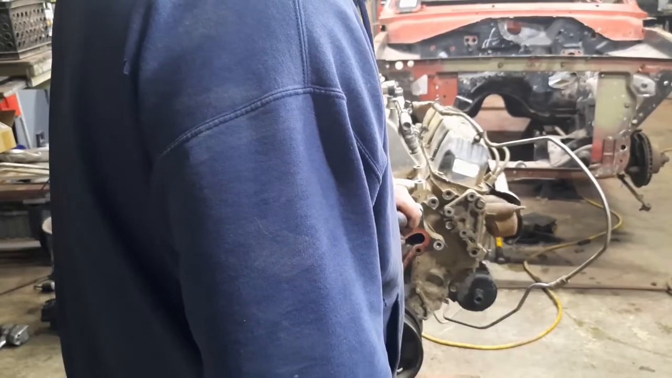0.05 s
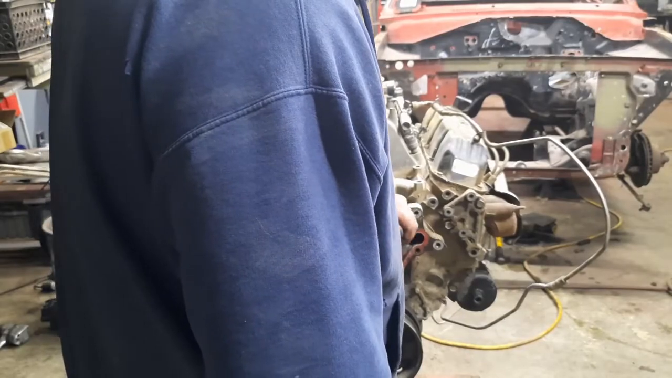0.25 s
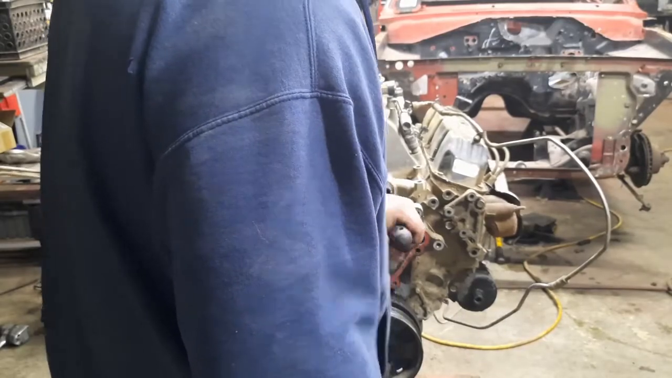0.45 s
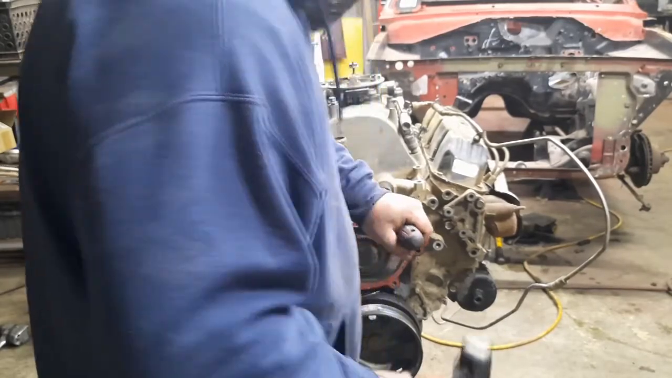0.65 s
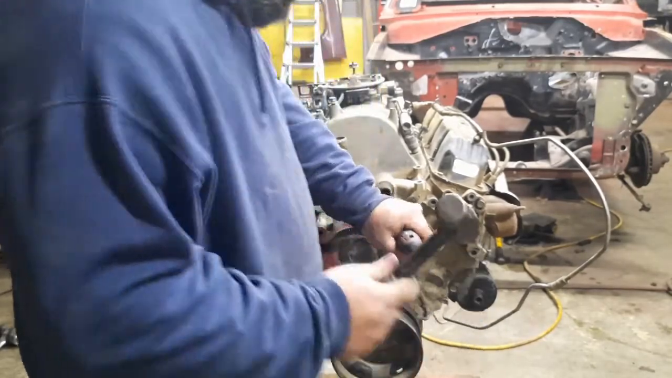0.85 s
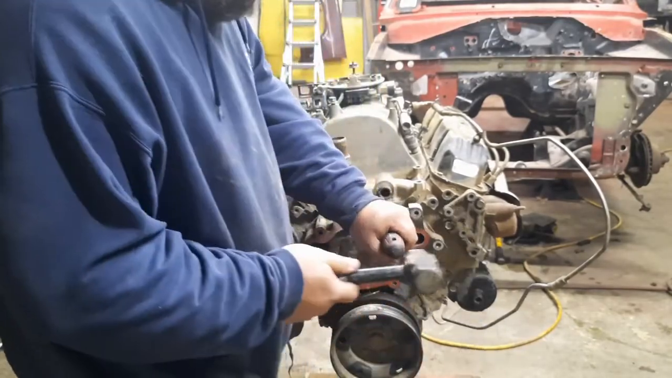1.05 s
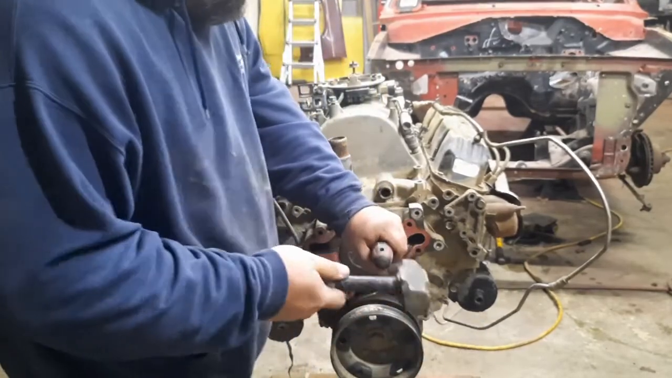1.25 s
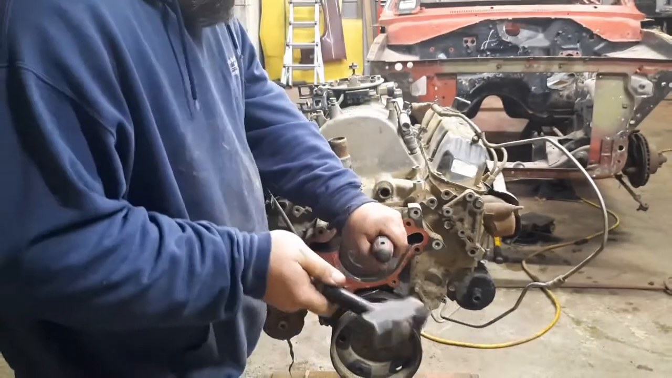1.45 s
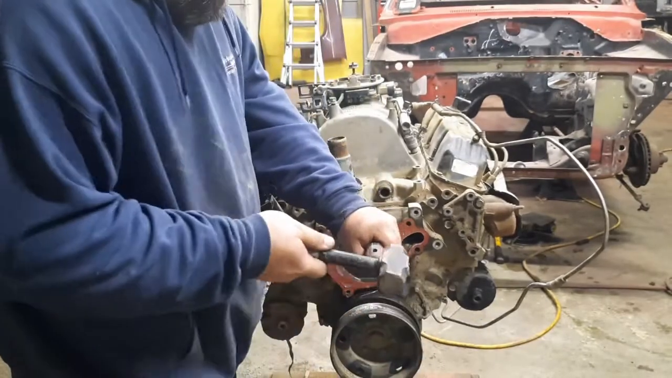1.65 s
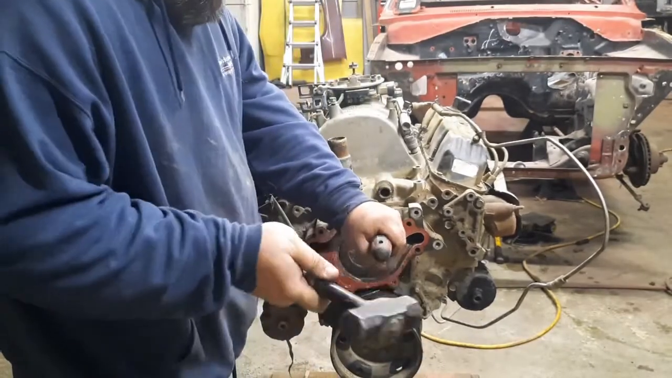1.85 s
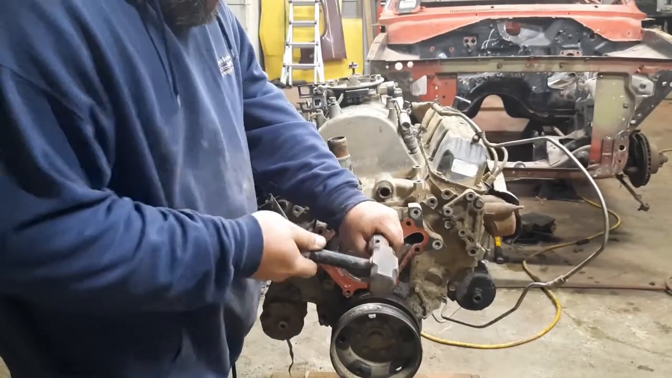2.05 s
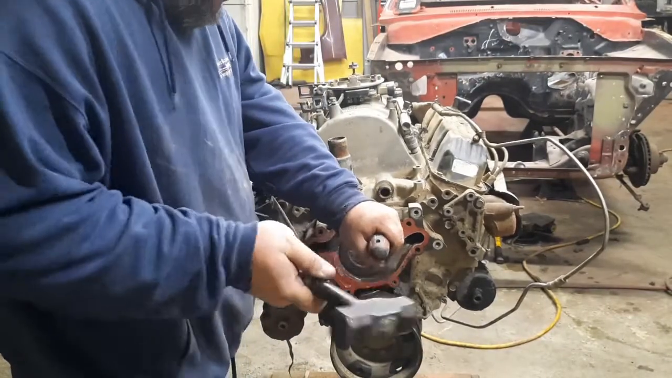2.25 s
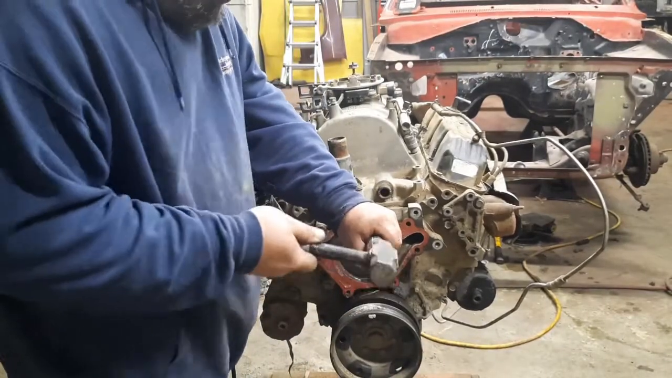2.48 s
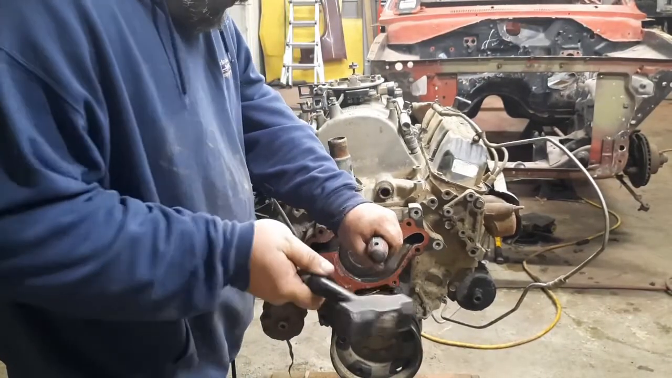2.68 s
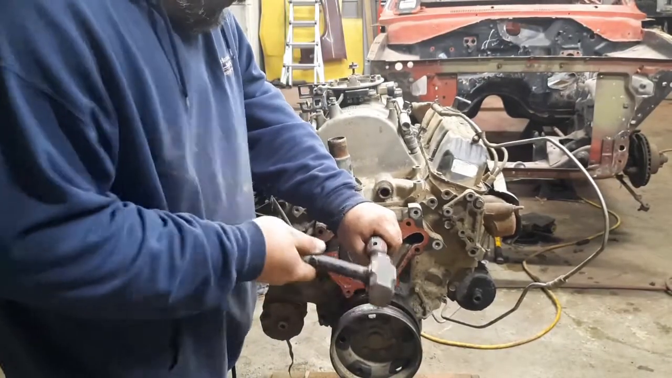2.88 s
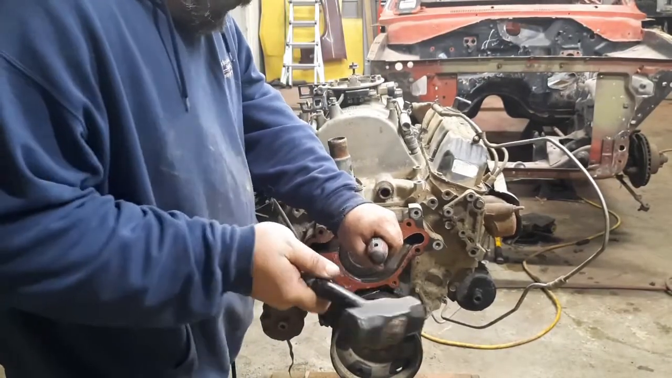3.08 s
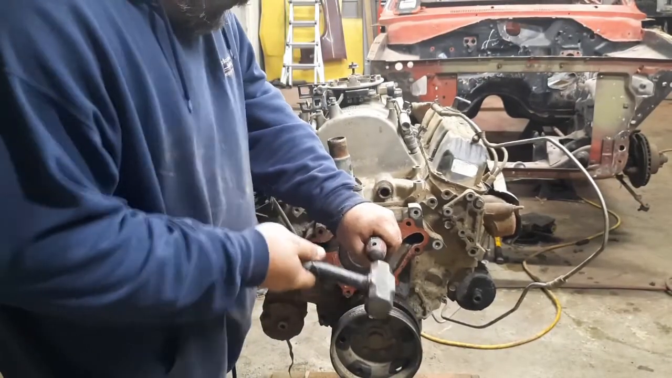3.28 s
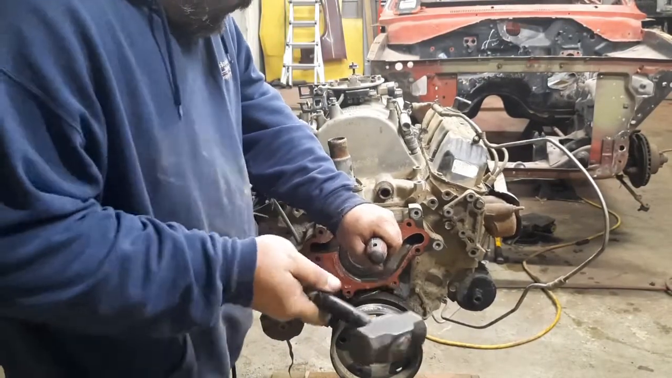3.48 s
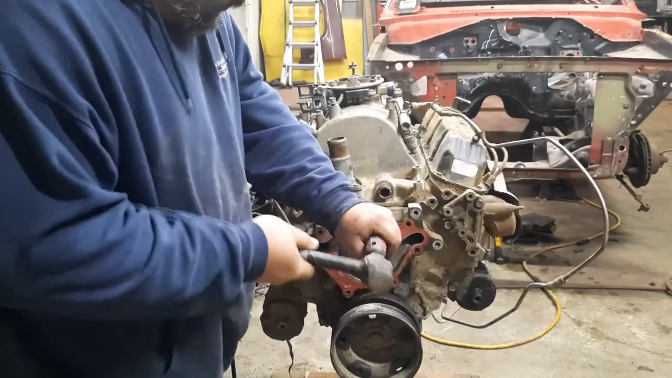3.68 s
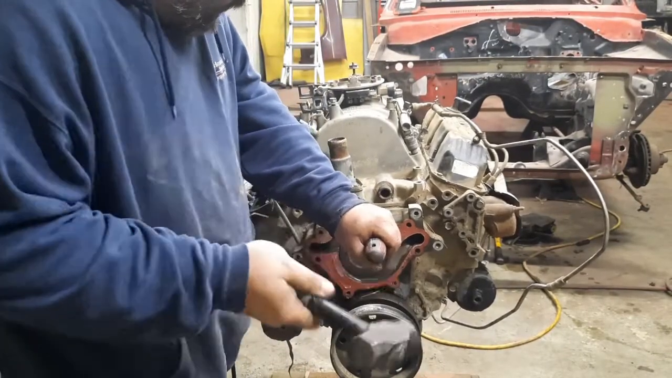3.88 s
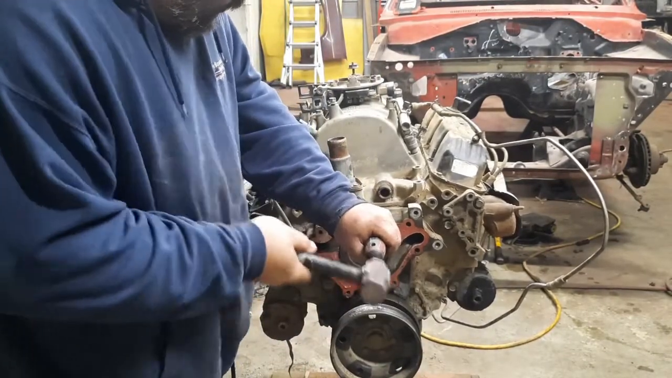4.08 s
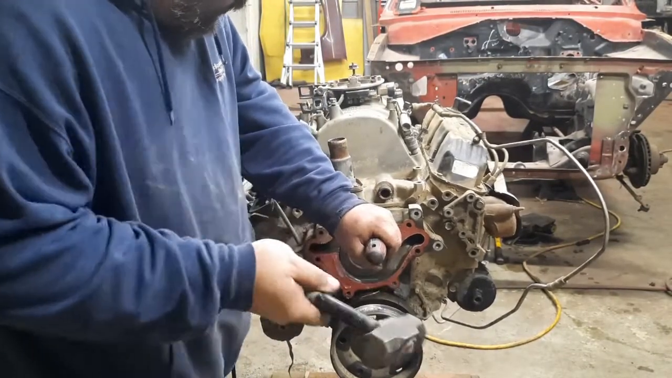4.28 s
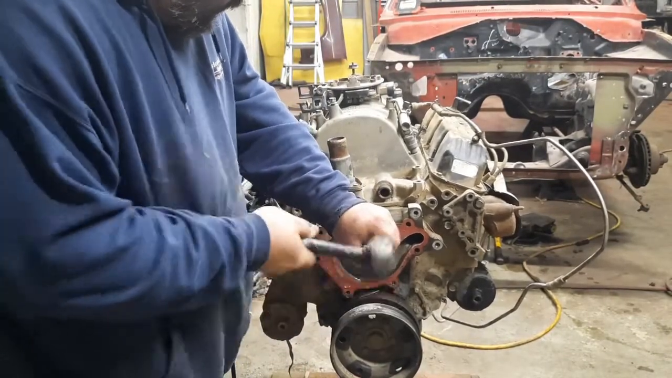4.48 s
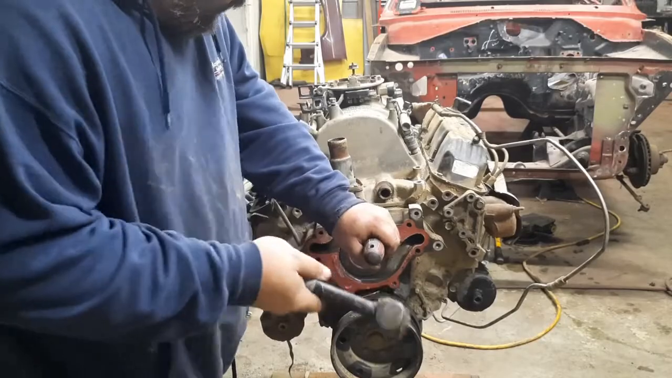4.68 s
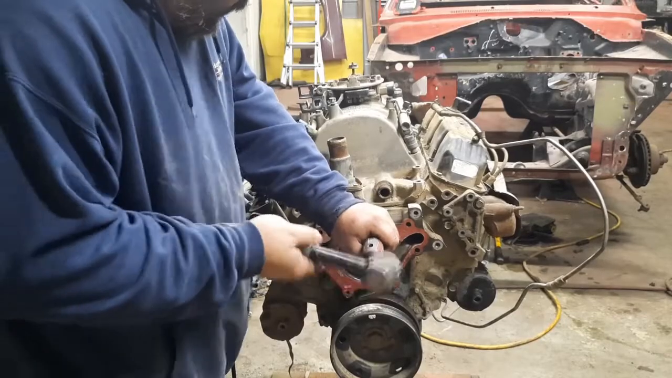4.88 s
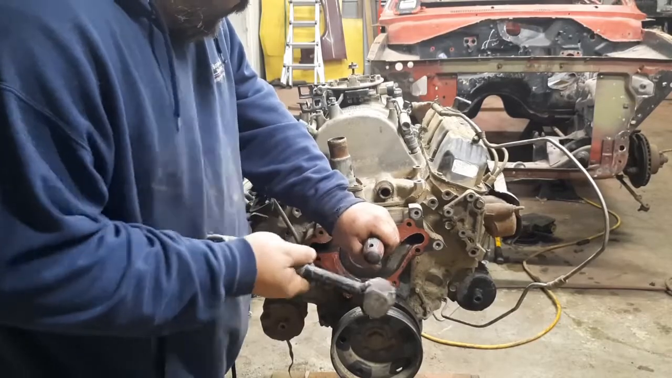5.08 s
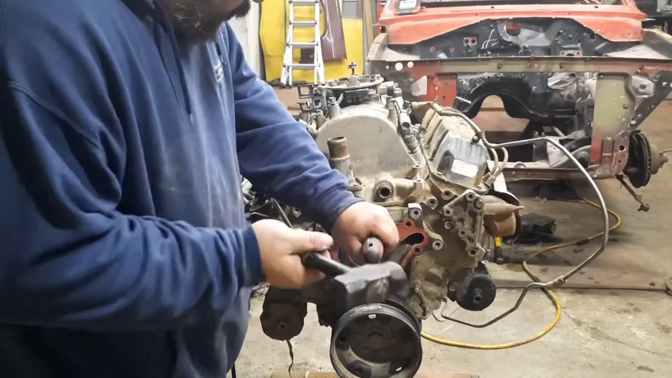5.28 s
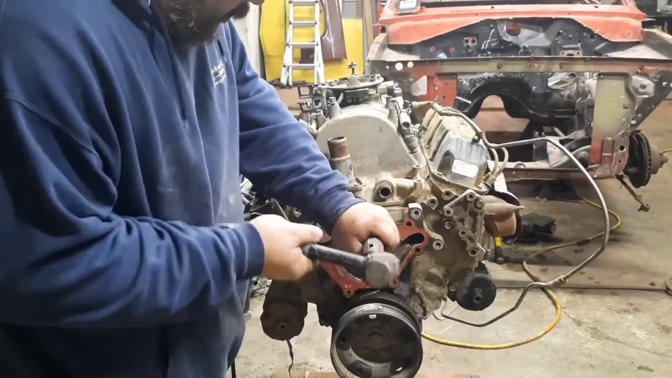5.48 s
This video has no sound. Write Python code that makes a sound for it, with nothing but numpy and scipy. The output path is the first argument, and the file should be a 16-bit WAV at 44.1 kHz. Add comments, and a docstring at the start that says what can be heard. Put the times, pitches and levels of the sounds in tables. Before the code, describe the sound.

A garage with a very faint, low, steady hum. At the start a thin, high metallic clink is dying away. Soft sleeve rustles come at about 0.5 and 0.65 seconds, then a steel tool scrapes roughly into place around 0.95-1.1 with a tiny bright tick. At 1.13 a light, dull hammer tap lands and bounces at once. Small metal touches and a cloth rub follow between 1.27 and 1.55. From 1.57 to 5.37 come ten hard blows, roughly every 0.42 seconds, loud and close. The first is a bright, loose clank with little ring; as the part seats, the strikes crack harder and the cast-iron block rings deeper and longer, fullest near 3.7. Later blows are solid and gradually more damped, with slightly more low thud. Each leaves a diffuse garage echo of under a second, overlapping the next; the last is still ringing at the end.

```python
"""A garage, humming faintly: a steel hammer drives a part into a cast-iron engine block. A clink fades, a sleeve
rustles, the tool scrapes into place, then come one light, bouncing tap and ten hard blows. Rubbing is coloured noise
under stroke envelopes; each blow is a burst of noise (crack) and two sets of damped modes, the clank of the part and
the ring of the block. As the part seats, the clank moves from its own pitch into the block, which rings deeper and
longer. The garage answers each blow with diffuse, decaying noise."""
import sys
import numpy as np
from scipy import signal
from scipy.fft import rfft, irfft, next_fast_len
from scipy.io import wavfile
from scipy.ndimage import uniform_filter1d, map_coordinates

SR = 44100
rng = np.random.default_rng(int(sys.argv[2]) if len(sys.argv) > 2 else 0)


def transcribe(signal):
    """Save signal, clipped to [-1, 1], as a 16-bit WAV file at the path in sys.argv[1]."""
    frames = np.atleast_2d(signal).T
    limited = np.clip(frames, -1, 1)
    pcm = np.round(limited * 32767).astype(np.int16)
    wavfile.write(sys.argv[1], SR, pcm)


N = 243873  # length in samples
AGE = np.arange(SR) / SR  # time since a contact, s

# Low tones in the hum. Each row: frequency in Hz, level in dB before a common lift.
DRONE_TONES = [(75.4, -71.5), (156.1, -77.5)]
DRONE_LIFT_DB = 5.5
# Rumble of the garage. Each row: frequency in Hz, relative density in dB per Hz.
HUM_SPECTRUM = [(20, -29.5), (33, -26), (48, -5), (62, -1.5), (88, 1), (115, -13), (155, -1), (200, -16.5),
                (310, -8), (420, -8.5), (620, -13.5), (950, -21), (2500, -35), (9400, -41), (16000, -43)]
# A faint, fading clink. Each row: frequency in Hz, t60 in s, level in dB.
CLINK_MODES = [(1890, 0.47, -62.5), (2720, .33, -64), (3295, 0.37, -67), (3460, 0.41, -61),
               (3540, 0.44, -61), (5216, .34, -66)]
# The sleeve rubs with each move of the arm. Each row: start in s, length in s, level in dB.
SLEEVE_STROKES = [(-.06, .06, -55), (.465, 0.028, -57), (.65, 0.095, -56), (.92, .06, -60),
                  (1.5, .04, -51.5), (1.542, 0.028, -41)]
SLEEVE_ATTACK_S, SLEEVE_T60_S = 0.023, 0.52
# Rubbing cloth. Each row: frequency in Hz, relative density in dB per Hz.
CLOTH_SPECTRUM = [(350, -30), (600, -3.5), (768, -9.5), (1240, -6), (2650, -9), (3210, -13), (6200, -14),
                  (13000, -34), (16000, -34)]
# The tool is set on, then pushed home. Each row: start in s, length in s, level in dB.
SCRAPE_STROKES = [(.935, .055, -52.5), (.991, .11, -33.5)]
SCRAPE_ATTACK_S, SCRAPE_T60_S = 0.01, 0.4
# Scraping steel. Each row: frequency in Hz, relative density in dB per Hz.
SCRAPE_SPECTRUM = [(59, -44), (100, -5.5), (210, -19), (328, 0), (373, -7.5), (547, -7), (872, -9),
                   (950, 0.5), (1200, -9.5), (2690, -12), (9410, -30.5), (11400, -34.5), (16000, -42)]
# Light touches of steel. Each row: time in s, level in dB.
TOUCHES = [(1.0152, -31.5), (1.2745, -52), (1.286, -37.5), (1.4905, -37)]
# Colour of a touch. Each row: frequency in Hz, relative density in dB per Hz.
TOUCH_SPECTRUM = [(1500, -32), (4500, -4.5), (7000, 6.5), (9500, -8), (13000, -7), (16000, -20.5)]

# Hammer blows, the first two being the tap and its bounce. Each row: time in s, force in dB.
BLOW_FORCES = [(1.1291, -8.5), (1.1372, -17.5), (1.5700, -0.5), (1.9773, 0), (2.39, 1), (2.8163, 1),
               (3.2419, 1), (3.6570, 1), (4.0762, 0.5), (4.4990, 0.5), (4.9266, 0), (5.371, 0)]
# How tightly the part sits: the first hard blow frees it, then it tightens until it is home.
# Each row: time in s, seating from 0 (loose) to 1 (tight).
SEATING_CURVE = [(1.13, 0.23), (1.57, 0), (1.95, 0.064), (4.1, 0.97), (4.9, 1), (5.37, 0.82)]
# Short resonances of the struck part. Each row: frequency in Hz, t60 in s, dB when loose, dB when seated.
CLANK_MODES = [(331.8, 0.075, -22, -16), (485.6, 0.081, -30.5, -16), (611, 0.11, -29, -22),
               (806, 0.057, -31, -29.5), (903, 0.053, -29.5, -22.5), (1116, 0.05, -22, -9),
               (1282, 0.029, -6.5, -15), (1389, 0.022, -1.5, -6.5), (1519, 0.032, -15, -11.5),
               (1686, 0.066, -30, -28), (2037, 0.05, -18, -20), (2190, 0.022, -22.5, -2),
               (2383, 0.041, -17, -19.5), (2750, 0.022, -13.5, -35), (3887, 0.024, -43, -13.5),
               (5250, 0.0085, -8.5, -21), (5525, 0.012, -13, -30)]
# Long ring of the block. Each row: frequency in Hz, t60 in s, dB when loose, dB when seated.
RING_MODES = [(284.8, 0.72, -23.5, -25), (301, 0.68, -34, -31), (315.3, 0.74, -35.5, -32),
              (338.8, 0.58, -36.5, -31), (387.2, 0.55, -31.5, -22.5), (397.3, 0.61, -40.5, -21),
              (410, 0.66, -43, -25), (436.3, 0.69, -33.5, -19.5), (457.6, 0.71, -42, -28),
              (549.5, 1, -41.5, -40.5), (587, 0.62, -37, -34.5), (686, 0.55, -32, -35),
              (776, 0.59, -27, -37.5), (870, 0.7, -43, -37), (1090, .55, -45, -37.5),
              (1164, 0.65, -27.5, -38.5), (1344, 0.41, -27, -38), (1349, 0.5, -29, -55),
              (1505, 0.59, -25.5, -35.5), (1593, 0.74, -28, -41), (1725, 0.32, -48, -43),
              (2100, 0.47, -61, -51), (2200, 0.89, -52, -41), (2290, 0.51, -40, -33),
              (3645, 0.38, -48, -24), (5860, 0.39, -51, -47), (6340, .3, -61, -32)]
# Crack of steel on steel. Each row: frequency in Hz, relative density in dB per Hz.
CRACK_SPECTRUM = [(150, -34), (500, 9.5), (1500, 3), (3000, 2.5), (5500, -1), (7500, -6), (9500, -20.5),
                  (12000, -20.5), (16000, -28)]
# Thud of the engine stand. Each row: frequency in Hz, relative density in dB per Hz.
THUD_SPECTRUM = [(18, -14), (32, -1.5), (45, -11.5), (70, -1.5), (110, -6), (135, -12.5), (170, -1.5),
                 (210, -17.5), (300, -23), (800, -68)]
# The garage's answer to the crack. Each row: frequency in Hz, relative density in dB per Hz.
WASH_SPECTRUM = [(100, -13), (220, -5.5), (320, 1), (800, 0.5), (1500, 3.5), (2800, -2.5), (4200, -3.5),
                 (6000, -9.5), (8000, -13.5), (9300, -24.5), (12000, -22), (15500, -31)]
# The walls' answer to the clank. Each row: frequency in Hz, relative density in dB per Hz.
WALL_SPECTRUM = [(300, -0.73), (900, -0.55), (3000, -0.56)]
# Reverberation of the garage. Each row: frequency in Hz, t60 in s.
GARAGE_T60 = [(60, 1.4), (160, 0.95), (420, 0.81), (1100, 0.7), (3000, 0.73), (5500, 0.69), (8000, 0.61),
              (14000, 0.42)]
# Likeness of left and right in diffuse sound. Each row: frequency in Hz, correlation from 0 to 1.
LEFT_RIGHT_LIKENESS = [(60, 0.98), (350, 0.7), (750, 0.48), (1500, 0.022), (5000, 0.024)]
# Colour of the two microphones. Each row: frequency in Hz, left minus right in dB.
MICROPHONE_LEAN = [(60, 3), (200, 0), (380, 3), (700, 2.5), (1300, 3), (2400, 2), (4400, 1.3), (7000, -5),
                   (9000, 10), (15000, 7)]

# base levels, to which each part of a blow adds its own dB
CRACK_DB, CRACK_TIGHT_DB = -3, 4  # crack on a loose part, and what a tight one adds
RING_DB, RING_LOOSE_DB = 4, -8.5  # ring of the block, and what a loose part fails to pass on
BOTTOM_S, DAMPING_DB_PER_S = 3.66, 4.5  # as the part bottoms out it damps the block more and more
THUD_DB, THUD_DB_PER_S = -39.5, 2  # the stand takes more of each blow once the part bottoms out
ROOM_DB = 1  # the garage's answer
CRACK_GROWS, RING_GROWS, ROOM_GROWS = 0.25, 0.51, 0.4  # extra dB per dB of force: a soft tap is duller and drier
RING_TILT = 0.25  # dB per octave per dB of force: a soft tap barely wakes the high ring
TOP_HZ = 15700  # band limit of the recorder


def amp(db):
    """A level in decibels corresponds to an amplitude ratio of 10 ** (dB / 20)."""
    return 10 ** (np.asarray(db) / 20)


def unit(x):
    """A signal divided by its root mean square has unit effective value."""
    return x / np.sqrt(np.mean(x ** 2) + 1e-20)


def along(points, hz):
    """Properties given at a few frequencies are interpolated on a logarithmic frequency axis."""
    f, v = np.transpose(points)
    return np.interp(np.log(hz + 1), np.log(f + 1), v)


def filtered(x, response):
    """A linear system multiplies the spectrum of its input by its frequency response."""
    size = x.shape[-1]
    m = next_fast_len(size + SR // 8)  # padding keeps delayed sound from wrapping round
    hz = np.fft.rfftfreq(m, 1 / SR)
    return irfft(rfft(x, m) * response(hz), m)[..., :size]


def noise(spectrum, size):
    """Diffuse sound of unit rms is alike at both ears in the bass and unrelated in the treble."""
    def mid_side_response(hz):
        # mid and side weighted by cosine and sine of this angle give the wanted correlation
        angle = np.arccos(np.clip(along(LEFT_RIGHT_LIKENESS, hz), -1, 1)) / 2
        return amp(along(spectrum, hz)) * [np.cos(angle), np.sin(angle)]

    mid, side = filtered(rng.standard_normal((2, size)), mid_side_response)
    return unit(np.array([mid + side, mid - side]))


def fade(t60):
    """A damped vibration decays exponentially, by 60 dB in its t60."""
    return amp(-60 * AGE / t60)


def onset(rise):
    """A driven response approaches its full amplitude exponentially, with time constant rise in s."""
    return 1 - np.exp(-AGE / rise)


def strokes(rows, attack, t60):
    """Rubbing builds up, holds while the stroke lasts and dies away; the powers of strokes add."""
    t, power = np.arange(N) / SR, 0
    for start, length, db in rows:
        rise = 1 - np.exp(-np.maximum(t - start, 0) / attack)
        release = amp(-60 * np.maximum(t - start - length, 0) / t60)
        power = power + (amp(db) * rise * release) ** 2
    return np.sqrt(power)


def tail(spectrum, rise):
    """Reverberation builds up, then each frequency decays at the rate the enclosure allows it."""
    hz, t, z = signal.stft(noise(spectrum, size=SR), SR, nperseg=512)
    decay = amp(-60 * t / along(GARAGE_T60, hz)[:, None])
    dying = signal.istft(z * decay, SR, nperseg=512)[1][:, :SR]
    return dying * onset(rise)


def modes(table, seat, phases, scatter_db):
    """A solid rings in damped modes, whose balance shifts as the part tightens in the block."""
    out = 0
    for (hz, t60, loose_db, seated_db), phase in zip(table, phases):
        level = loose_db + seat * (seated_db - loose_db) + scatter_db * rng.standard_normal()
        out = out + amp(level) * fade(t60) * np.sin(2 * np.pi * hz * AGE + phase)
    return out


def add(track, s, sound):
    """Sounds superpose: this one is added in place from time s."""
    part = track[:, round(s * SR):][:, :sound.shape[-1]]
    part += sound[..., :part.shape[-1]]


def hum():
    """A low hum is the sum of steady tones, wavering slowly in phase, and a broadband rumble."""
    t = np.arange(N) / SR
    tones = 0
    for hz, db in DRONE_TONES:
        # smooth curve through six random points per second
        drift = map_coordinates(rng.standard_normal(int(t[-1] * 6) + 4), [t * 6])
        tones = tones + amp(db + DRONE_LIFT_DB) * np.sin(2 * np.pi * hz * t + 0.74 * drift)
    return tones + amp(-61) * noise(HUM_SPECTRUM, size=N)


def clink():
    """A faint clink is a few modes decaying freely, each with its own phase at left and right."""
    out = np.zeros((2, N))
    for hz, t60, db in CLINK_MODES:
        phase = rng.uniform(0, 2 * np.pi, (2, 1))
        add(out, 0, amp(db) * fade(t60) * onset(rise=0.0026) * np.sin(2 * np.pi * hz * AGE + phase))
    return out


def sleeve():
    """Friction of cloth radiates broadband noise that follows the strokes of the arm."""
    return strokes(SLEEVE_STROKES, SLEEVE_ATTACK_S, SLEEVE_T60_S) * noise(CLOTH_SPECTRUM, size=N)


def scraping():
    """Sliding steel moves in tiny slips, which roughen the level of its friction noise."""
    slip_energy = uniform_filter1d(rng.exponential(size=N) ** 3, size=130)
    slips = unit(np.sqrt(np.abs(slip_energy)))
    envelope = strokes(SCRAPE_STROKES, SCRAPE_ATTACK_S, SCRAPE_T60_S)
    return envelope * slips * noise(SCRAPE_SPECTRUM, size=N)


def touches():
    """A light contact of steel is a short burst of treble noise followed by its reverberation."""
    out = np.zeros((2, N))
    for s, db in TOUCHES:
        burst = noise(TOUCH_SPECTRUM, size=SR) * fade(0.019)
        answer = amp(-17.5) * tail(TOUCH_SPECTRUM, rise=0.0022)
        add(out, s, amp(db) * (burst + answer))
    return out


def contact(s, force_db):
    """Impact energy divides: a tighter part cracks harder and drives the block, until it bottoms out."""
    seat = np.interp(s, *np.transpose(SEATING_CURVE))
    home_s = max(s - BOTTOM_S, 0)
    crack_db = CRACK_DB + CRACK_TIGHT_DB * seat + CRACK_GROWS * force_db
    ring_db = RING_DB + RING_LOOSE_DB * (1 - seat) ** 2 + RING_GROWS * force_db - DAMPING_DB_PER_S * home_s
    thud_db = THUD_DB + THUD_DB_PER_S * home_s
    return seat, crack_db, ring_db, thud_db


def struck_part(seat):
    """Modes of a loose part start together; a tight one radiates from all over the block, out of step."""
    phases = seat * rng.normal(0, 1.23, len(CLANK_MODES))
    return modes(CLANK_MODES, seat, phases, scatter_db=1.43) * onset(rise=0.00093)


def steel_crack(seat, crack_db):
    """The brief collision of steel radiates a noise burst, which lasts longer on a tight part."""
    burst = noise(CRACK_SPECTRUM, size=SR) * fade(0.018 + 0.0096 * seat)
    return amp(crack_db - 7) * burst * onset(rise=0.00051)


def floor_bounce(direct):
    """The far side of the part radiates in opposite phase and arrives 7 ms late by way of the floor."""
    return -0.3 * filtered(direct, lambda hz: np.exp(-2j * np.pi * hz * 0.007))


def castings_scatter(crack_db):
    """The crack scatters off nearby castings before the walls answer."""
    return amp(crack_db - 22.5) * noise(CRACK_SPECTRUM, size=SR) * fade(0.091) * onset(rise=0.0024)


def garage_answer(clank, crack_db, force_db, walls, wash):
    """The enclosure convolves the clank with its impulse response and answers the crack diffusely."""
    echo = amp(-5) * signal.fftconvolve(clank[None], walls / np.linalg.norm(walls[0]), axes=1)[:, :SR]
    return amp(ROOM_DB + ROOM_GROWS * force_db) * (echo + amp(crack_db - 21.5) * wash)


def block_ring(seat, ring_db, force_db, phases):
    """The block's modes ring long, and a harder blow excites the high ones more."""
    ring = amp(ring_db) * modes(RING_MODES, seat, phases, scatter_db=1.1) * onset(rise=0.013)
    return filtered(ring, lambda hz: amp(RING_TILT * force_db * np.log2(np.clip(hz / 350, 1, 6))))


def room_paths():
    """Three diffuse responses: the walls to the clank, the room to the crack, and the stand's thud."""
    return tail(WALL_SPECTRUM, rise=0.0084), tail(WASH_SPECTRUM, rise=0.0017), tail(THUD_SPECTRUM, rise=0.0071)


def renewed(usual, fresh, change):
    """Unrelated responses mix by power: no two blows land on quite the same spot."""
    return np.sqrt(1 - change) * usual + np.sqrt(change) * fresh


def hammer():
    """An impact superposes crack, clank, floor bounce, scatter, the block's ring, the thud and the room."""
    out = np.zeros((2, N))
    # block and listener stay put, so all blows share nearly the same paths through the room
    usual = room_paths()
    # high modes reach left and right out of step
    ring_phases = [rng.uniform(0, 2 * np.pi) + rng.normal(0, min(hz / 1500, 2), (2, 1))
                   for hz, *_ in RING_MODES]
    for s, force_db in BLOW_FORCES:
        seat, crack_db, ring_db, thud_db = contact(s, force_db)
        walls, wash, thud = [renewed(old, new, change=0.33) for old, new in zip(usual, room_paths())]
        clank = struck_part(seat)
        direct = clank + steel_crack(seat, crack_db)
        early = direct + floor_bounce(direct) + castings_scatter(crack_db)
        room = garage_answer(clank, crack_db, force_db, walls, wash)
        ring = block_ring(seat, ring_db, force_db, ring_phases)
        add(out, s, amp(force_db) * (early + room + ring + amp(thud_db) * thud))
    return out


def scene():
    """The sound field is the sum of the garage's hum, the handling noises and the hammer blows."""
    return hum() + clink() + sleeve() + scraping() + touches() + hammer()


def record(dry):
    """Two microphones differ in colour; the recorder saturates on high peaks and ends at its band limit."""
    heard = filtered(dry, lambda hz: amp(along(MICROPHONE_LEAN, hz) * [[0.5], [-0.5]]))
    ceiling = 0.99
    rounded = heard / (1 + np.abs(heard / ceiling) ** 6) ** (1 / 6)
    return filtered(rounded, lambda hz: 1 / np.sqrt(1 + (hz / TOP_HZ) ** 120))


dry = scene()
out = record(dry)
transcribe(out)
```